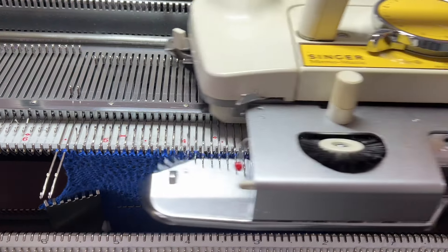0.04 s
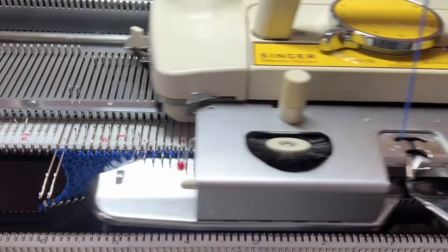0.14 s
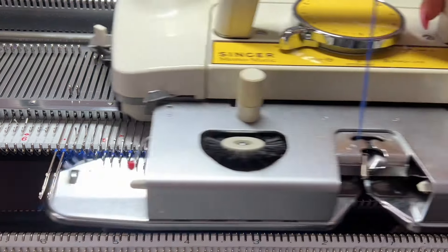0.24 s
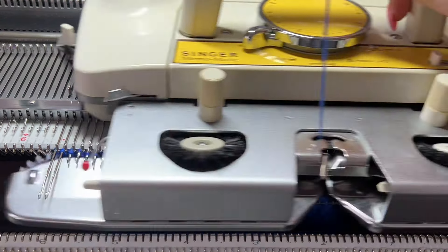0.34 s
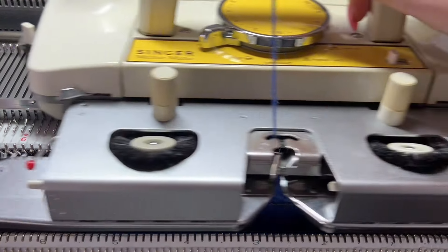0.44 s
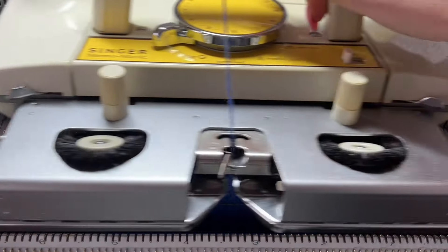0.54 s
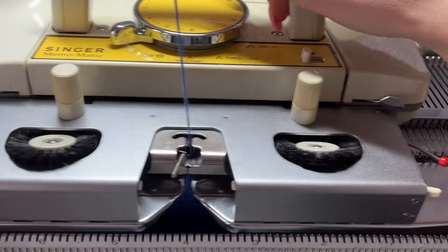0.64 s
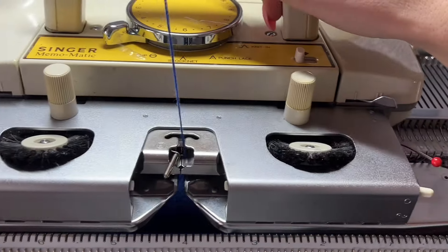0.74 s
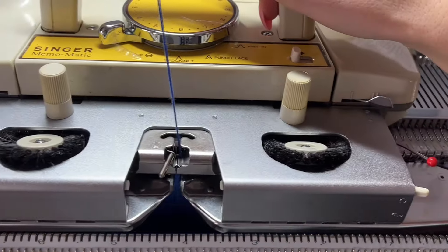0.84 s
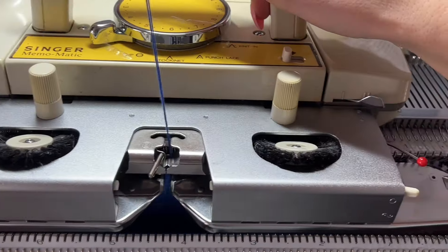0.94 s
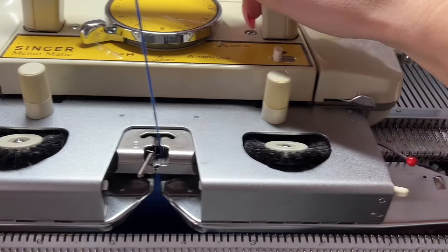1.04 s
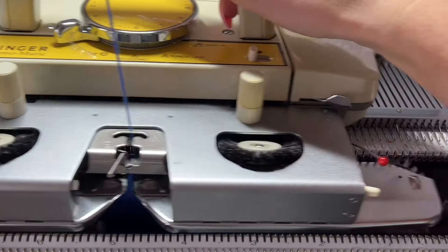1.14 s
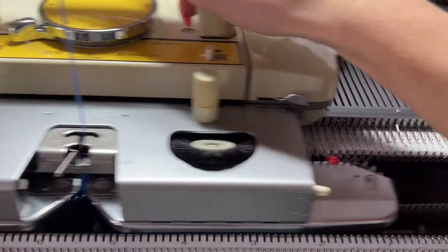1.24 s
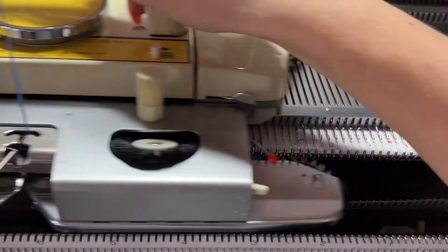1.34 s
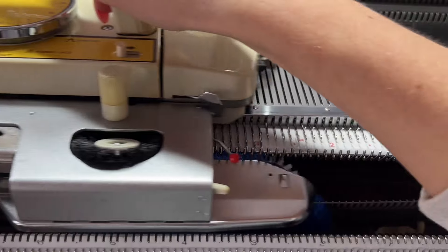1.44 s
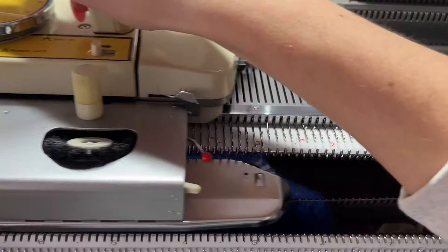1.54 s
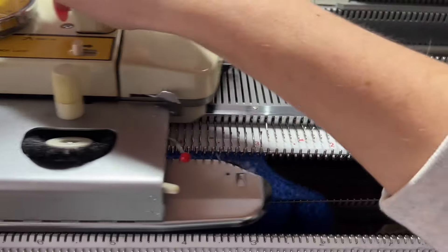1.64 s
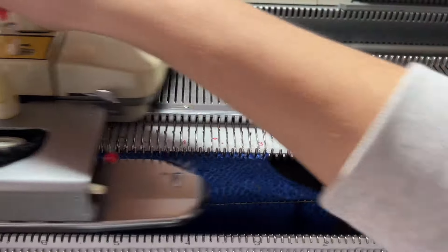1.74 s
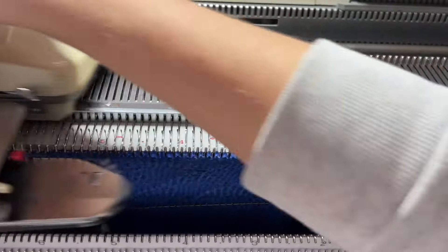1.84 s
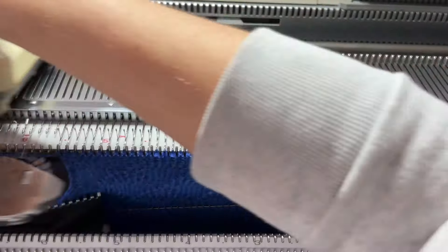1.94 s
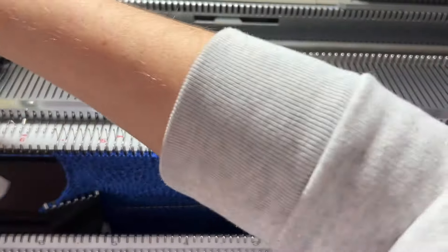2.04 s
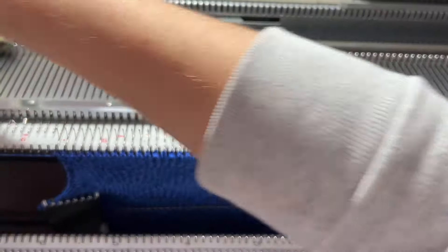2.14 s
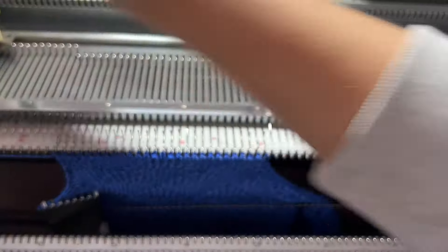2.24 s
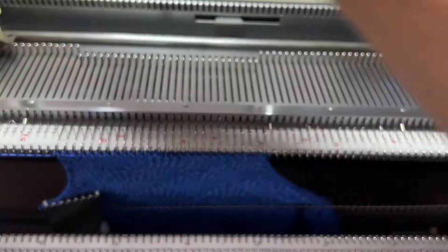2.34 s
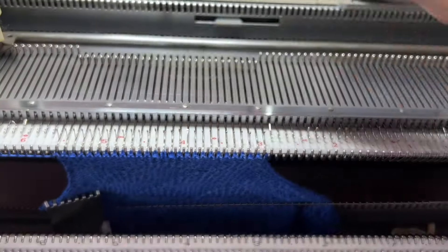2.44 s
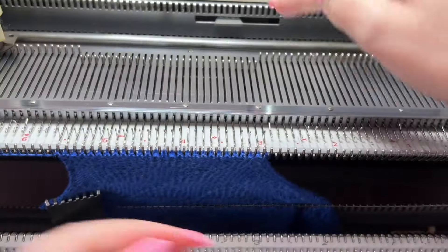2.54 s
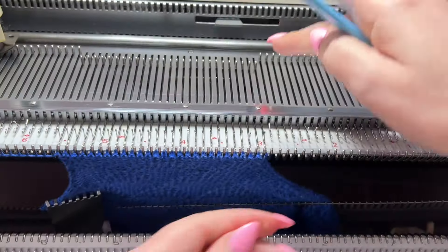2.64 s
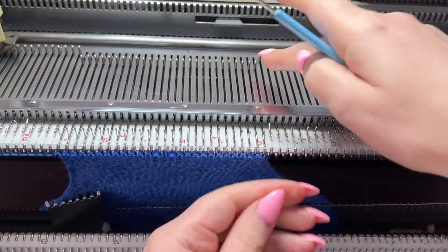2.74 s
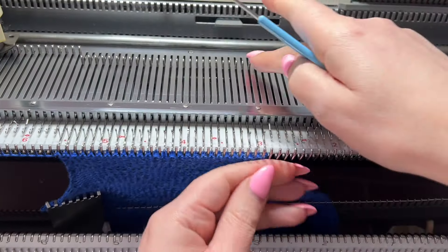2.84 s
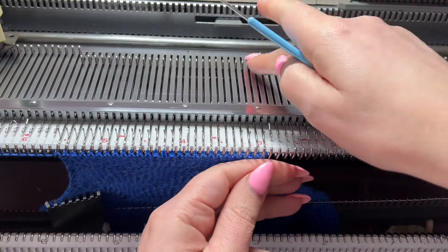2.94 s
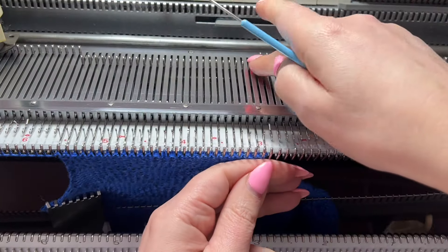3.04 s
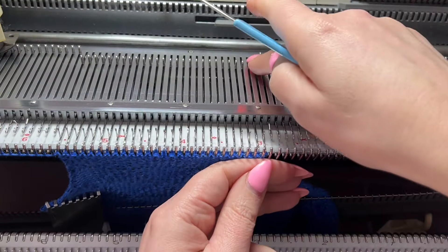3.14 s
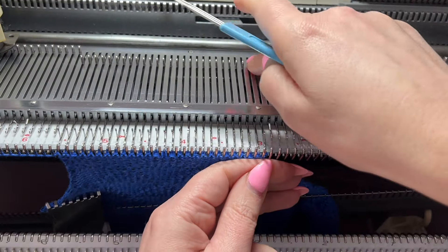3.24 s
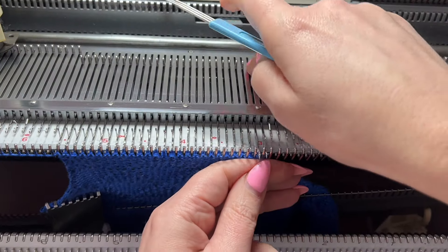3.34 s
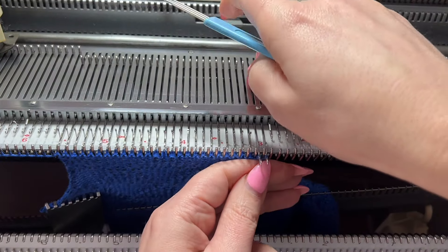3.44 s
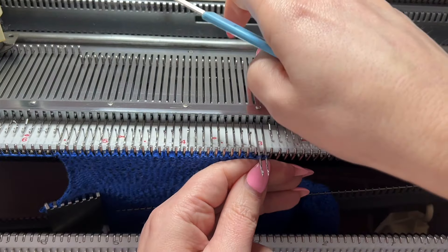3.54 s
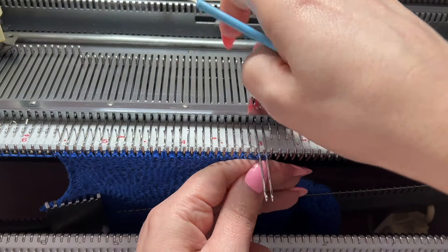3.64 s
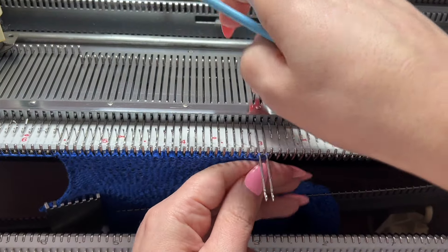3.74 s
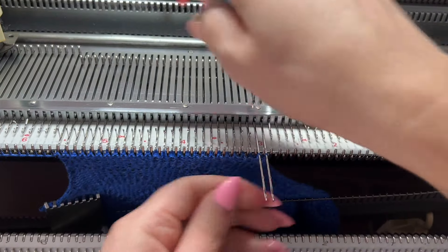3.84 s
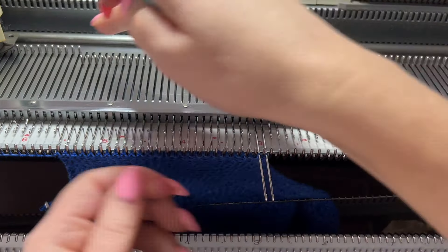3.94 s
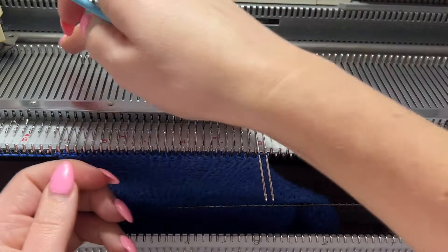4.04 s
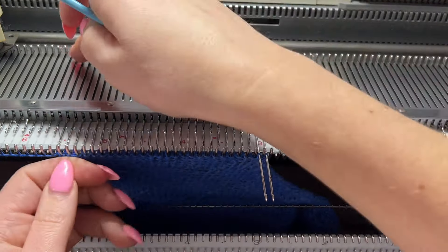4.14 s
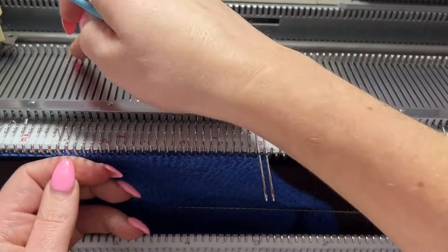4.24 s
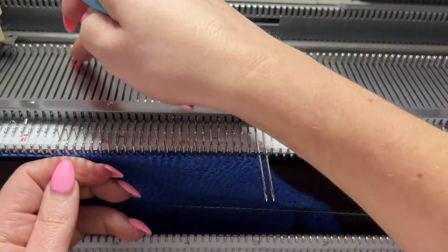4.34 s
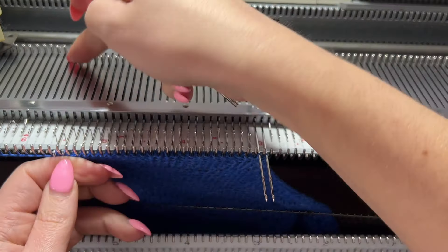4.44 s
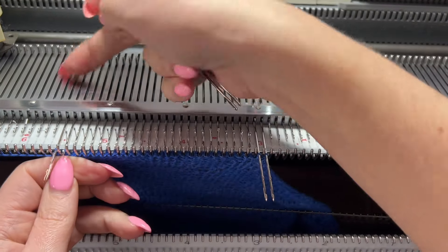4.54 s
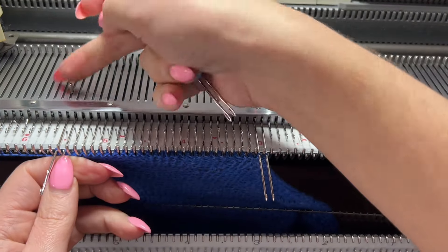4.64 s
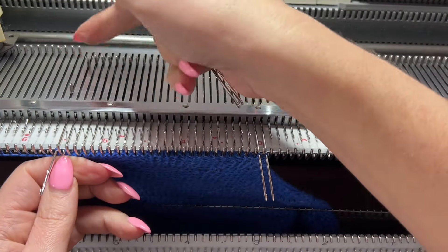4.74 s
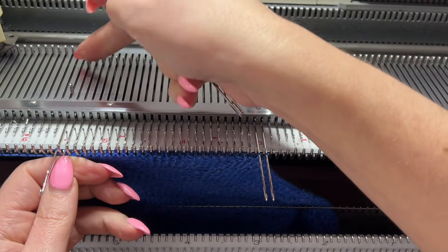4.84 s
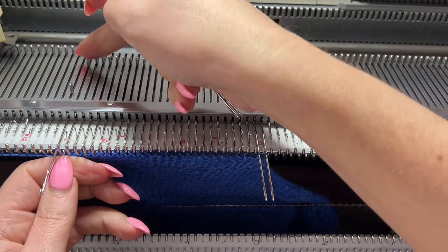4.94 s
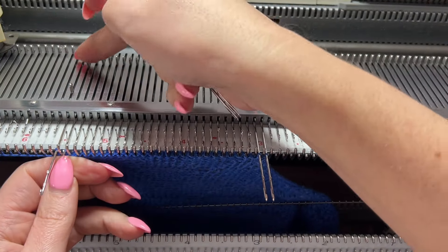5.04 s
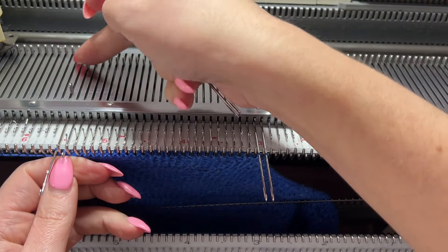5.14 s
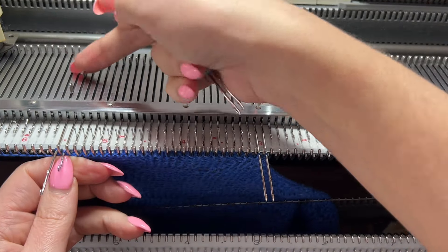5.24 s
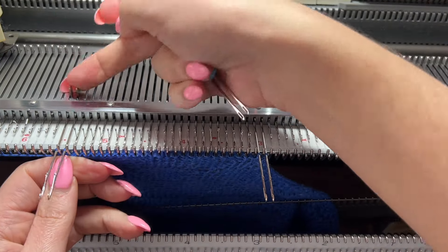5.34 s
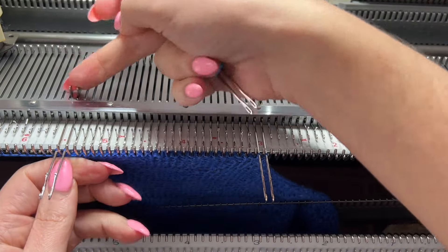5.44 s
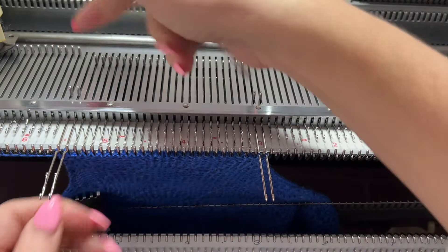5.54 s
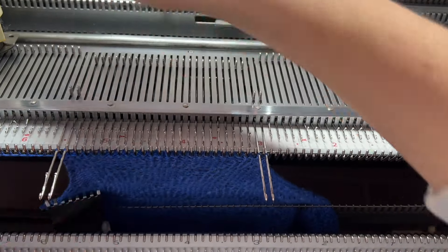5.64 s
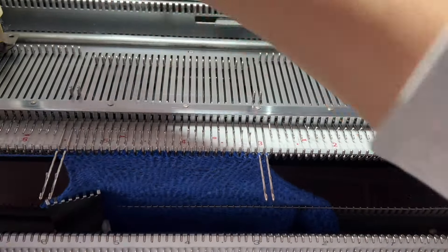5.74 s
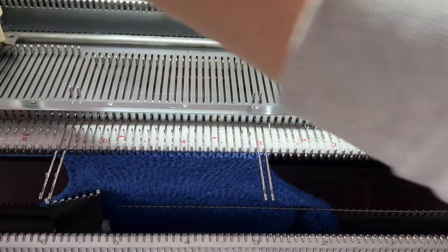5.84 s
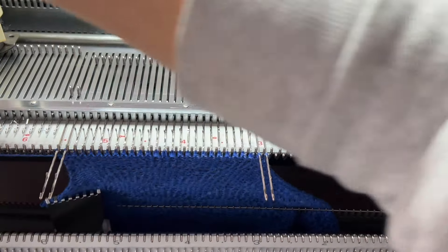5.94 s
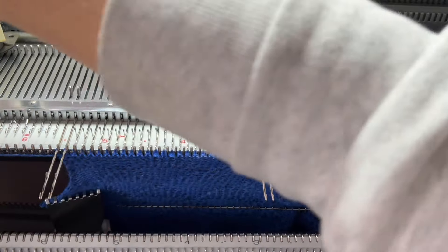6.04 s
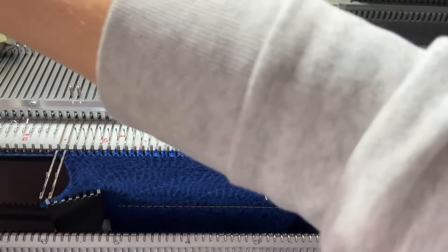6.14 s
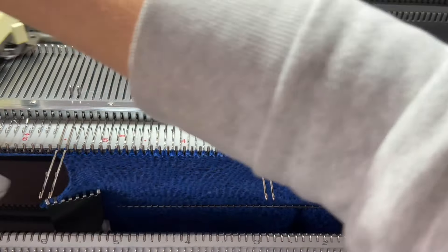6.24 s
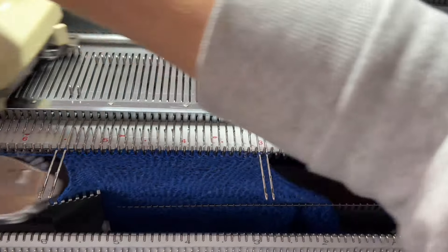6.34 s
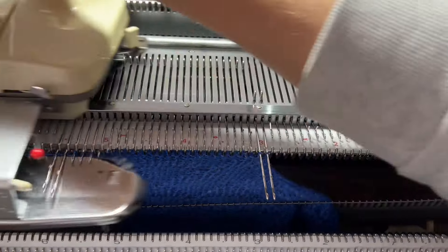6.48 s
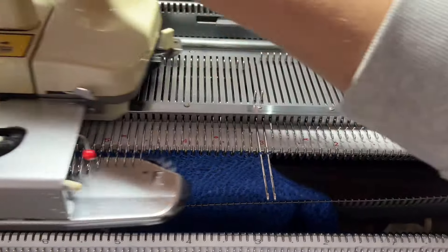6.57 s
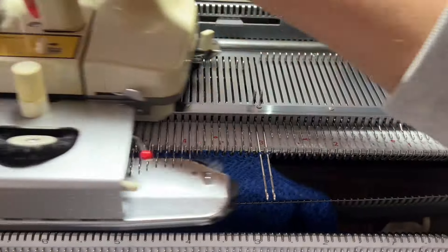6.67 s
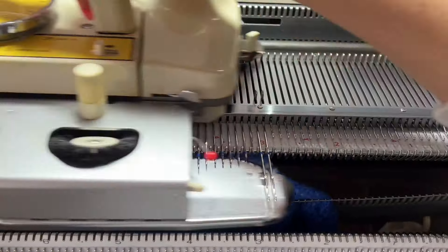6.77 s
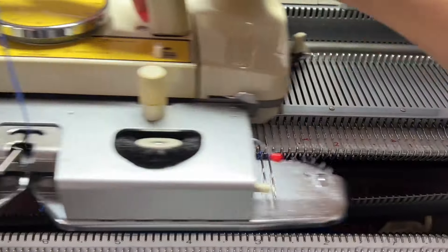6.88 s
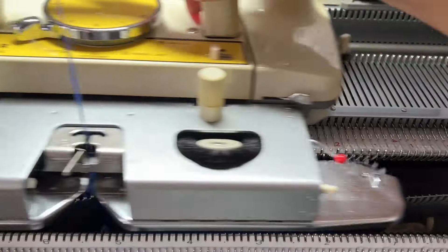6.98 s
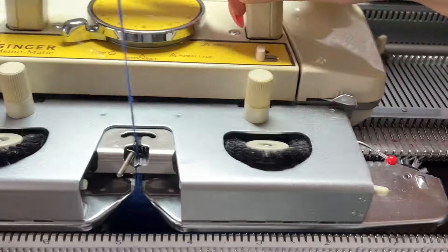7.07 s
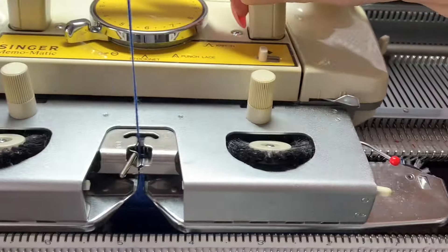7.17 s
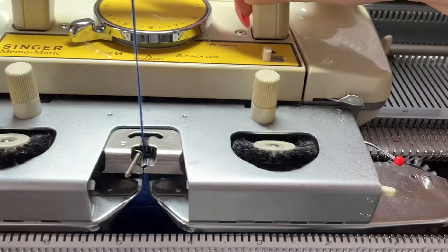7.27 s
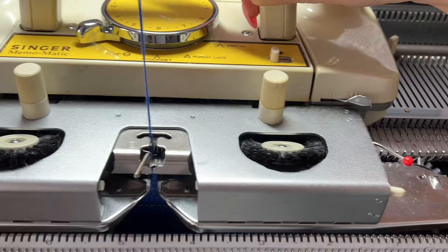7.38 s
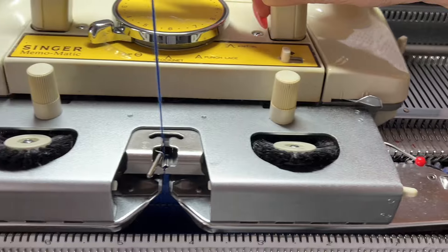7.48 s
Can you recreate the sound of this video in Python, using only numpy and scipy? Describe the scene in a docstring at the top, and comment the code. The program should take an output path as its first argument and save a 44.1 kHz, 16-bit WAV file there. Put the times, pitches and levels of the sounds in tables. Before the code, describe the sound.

A knitting machine carriage rasps and clatters along its steel needle bed, pauses while needles click by hand, then rasps across again.

```python
"""Knitting machine carriage on its needle bed

In a small room a carriage is pushed along a steel needle bed, pauses, and is pushed back. Ticks at each
needle butt drive friction noise and modes of bed and cams; clacks are noise bursts with steel modes.
Knocks ring the low modes of the stand and die away; between the passes needles are clicked by hand."""
import sys
import numpy as np
from scipy import signal
from scipy.fft import rfft, irfft, next_fast_len
from scipy.io import wavfile
from scipy.ndimage import uniform_filter1d

SR = 44100
rng = np.random.default_rng(int(sys.argv[2]) if len(sys.argv) > 2 else 0)


def waveform_to_disk(signal):
    """Save audio, clipped to [-1, 1], as 16-bit WAV at the path in sys.argv[1]."""
    frames = np.transpose(np.atleast_2d(signal))
    scaled = np.clip(frames, -1, 1) * 32767
    samples = np.round(scaled).astype(np.int16)
    wavfile.write(sys.argv[1], SR, samples)


N = 331191
T = np.arange(N) / SR
SLIDE_S = 3.645   # a needle is pushed along its slot

# Needles clicked by hand. Each row: start in seconds, relative levels of snap, steel clink and bed clunk
# in dB, pitch of the needle in Hz, bed tone in Hz, level of that tone above the clunk in dB.
NEEDLE_CLICKS = [(2.8404, -53, -68, -49.5, 8590, 794, -0.5), (2.9307, -57, -63, -60, 3940, 921, -5),
                 (2.9658, -47.5, -62, -66, 4870, 606, -2), (3.0624, -47, -63, -73, 7750, 773, -2),
                 (3.3664, -66.5, -67, -61.5, 3120, 794, -4), (3.4694, -25, -46.5, -44.5, 8910, 942, -14),
                 (3.6084, -24, -38.5, -35, 8570, 813, -7), (3.6448, -13.5, -34.5, -41.5, 8470, 929, -8),
                 (4.1474, -62, -74, -73, 3350, 552, -1.5), (4.5154, -19, -40, -41, 8190, 764, 0),
                 (4.557, -29, -47, -47, 8220, 778, -1), (4.857, -59, -73, -68, 7980, 942, -9),
                 (4.9454, -61, -79, -74.5, 3510, 603, 3), (5.117, -41, -60, -67, 4280, 600, -3),
                 (5.2053, -25.5, -49.5, -49, 8190, 732, -7), (5.3124, -28, -41, -41.5, 8510, 1260, -3),
                 (5.3258, -5, -23.5, -31, 8730, 1080, -6)]
# Resonances of bed and carriage shell. Each row: centre in Hz, width in Hz, peak in dB.
BED_RESONANCES = [(289.5, 30, 2), (295, 77, 2), (420, 100, 7.5), (497.7, 60, 7), (650, 20, 3.5),
                  (790, 150, -2), (1040, 120, -0.5), (1970, 70, 4.5), (2480, 290, 2), (3230, 66, 3.5),
                  (4520, 180, -2), (7655, 430, 1.5), (8253, 440, 2)]


def from_db(db):
    """Level and amplitude: 20 dB is a factor of ten."""
    return 10 ** (np.asarray(db) / 20)


def gains(tables):
    """Envelopes: each dB column becomes a gain in time, silent outside the spans of its tables."""
    total = 0
    for rows in tables:
        s, *columns = np.transpose(rows)
        total = total + from_db([np.interp(T, s, db, left=-150, right=-150) for db in columns])
    return total


def colour(x, spectrum, resonances=()):
    """Minimum-phase filtering: causal, with this spectrum and these peaks; white noise keeps its power."""
    size = 2 * next_fast_len(x.shape[-1] // 2 + SR // 8)
    hz = np.maximum(np.fft.rfftfreq(2 ** 13, 1 / SR), 1)
    points = np.array(spectrum)
    db = np.interp(np.log(hz), np.log(points[:, 0]), points[:, 1])
    for centre, width, peak_db in resonances:
        db = db + peak_db / (1 + (2 * (hz - centre) / width) ** 2)
    gain = from_db(db) / np.sqrt(np.mean(from_db(db) ** 2))
    cepstrum = irfft(np.log(gain))
    cepstrum[1:len(hz) - 1] *= 2      # folded onto positive time: nothing sounds early
    cepstrum[len(hz):] = 0
    impulse_response = irfft(np.exp(rfft(cepstrum)))
    return irfft(rfft(x, size) * rfft(impulse_response, size))[..., :x.shape[-1]]


def fade(t, t60):
    """Exponential decay: the amplitude is 60 dB down at t60 seconds."""
    return np.exp(-np.log(1000) * t / max(t60, 1e-3))


def rms_one(x):
    """Normalisation: scaled to unit power."""
    return x / np.sqrt(np.mean(x ** 2) + 1e-20)


def clicks(times, heights):
    """Impulsive excitation: one impulse at each time."""
    out = np.zeros(N)
    np.add.at(out, np.clip((np.asarray(times) * SR).astype(int), 0, N - 1), heights)
    return out


def ring(hits, hz, t60):
    """Damped resonator: a unit impulse sets a sine of about height 1 ringing."""
    r, w = fade(1 / SR, t60), 2 * np.pi * hz / SR
    return signal.lfilter([0, np.sin(w)], [1, -2 * r * np.cos(w), r * r], hits + 1e-18)


def strikes(times, levels_db, t60, tail_db, tail_t60, lead):
    """Dense modes as noise: a blow swells up within milliseconds, bursts and drops fast; a quieter tail follows."""
    before = SR // 30
    t = np.arange(-before, SR // 2) / SR
    out, since = np.zeros(N + SR), np.maximum(t, 0)
    onset = np.exp(np.minimum(t, 0) / lead)
    shape = onset * (fade(since, t60) + from_db(tail_db) * fade(since, tail_t60))
    for s, db, noise in zip(times, levels_db, rng.standard_normal((len(times), len(t)))):
        start = int(max(s, 0) * SR)
        out[start:start + len(t)] += from_db(db) * shape * noise
    return out[before:before + N]


def hush():
    """Diffuse background: steady coloured noise, mostly common to both sides."""
    # Room tone spectrum. Each row: frequency in Hz, relative level in dB per Hz.
    room_tone = [(20, -23.5), (45, -3.5), (62, 5), (85, -2.5), (120, 6.5), (200, -0.5), (300, -1.5),
                 (450, -5), (650, -14.5), (1200, -23.5), (2500, -34), (8000, -39), (15000, -49.5)]
    shared = rng.standard_normal(N)
    separate = .25 * rng.standard_normal((2, N))
    return from_db(-60.5) * colour(shared + separate, room_tone)


def room(x, t60, wet_db):
    """Diffuse reverberation: decaying noise, different on each side, strongest in the middle range."""
    # Reverberation spectrum. Each row: frequency in Hz, relative level in dB per Hz.
    room_colour = [(60, -12), (250, 7.5), (500, 5.5), (800, 9.5), (1300, 8.5), (2200, -3), (5000, -28.5),
                   (15000, -4)]
    t = T[:SR // 2]
    build_up = 1 - np.exp(-t / 0.0019)
    tail = rng.standard_normal((2, len(t))) * fade(t, t60) * build_up
    tail = colour(tail / np.sqrt(np.sum(tail[0] ** 2)), room_colour)
    return from_db(wet_db) * signal.fftconvolve(x[None], tail, axes=1)[:, :N]


def stereo_width(x, t60, wet_db):
    """Stereo width: a short diffuse smear of the treble, opposite in sign at the two ports."""
    t = T[:SR // 25]
    treble = signal.butter(2, 1000, "high", fs=SR, output="sos")
    smear = signal.sosfilt(treble, rng.standard_normal(len(t)) * fade(t, t60))
    side = signal.fftconvolve(x, smear / np.sqrt(np.sum(smear ** 2)))[:N]
    return from_db(wet_db) * np.array([side, -side])


def stand(contact_s, count=6):
    """Modal response to soft impact: knocks ring the low modes; left alone, the stand rocks evenly, weaker."""
    # The carriage jolts the stand. Each row: time in seconds, relative level in dB.
    knocks = [(0.111, -34), (0.234, -32), (0.596, -31), (0.727, -36), (1.274, -39), (1.413, -32),
              (1.852, -36), (7.267, -31), (7.491, -34)]
    # Modes of the stand. Each row: frequency in Hz, relative level in dB, t60 in seconds.
    stand_modes = [(72, -12.5, 0.44), (131, -4.5, 0.27), (151, 8.5, 0.16), (191, -6, 0.17), (303, -6, 0.11),
                   (400, -10.5, 0.13)]
    # the carriage stops and the stand rocks itself out
    rock_start_s, rock_period_s, rock_db, rock_loss_db = 2.078, .209, -28.5, 6
    rocking = [(rock_start_s + k * rock_period_s, rock_db - k * rock_loss_db) for k in range(count)]
    s, db = np.transpose(list(knocks) + rocking)
    t = T[:SR // 2]
    modes = sum(from_db(level) * np.sin(2 * np.pi * hz * t) * fade(t, t60) for hz, level, t60 in stand_modes)
    soft_onset = 1 - np.exp(-t / contact_s)
    low_cut = signal.butter(2, 45, "high", fs=SR, output="sos")
    response = signal.sosfilt(low_cut, modes * soft_onset)
    return signal.fftconvolve(clicks(s, from_db(db)), response)[:N]


def metal_blows(table, snap_db, clink_db, clunk_db, snap_t60, clunk_t60, tail_db, snap_tail_t60,
                tail_t60, lead, modes_db):
    """Impact of steel on steel: a bright snap, a clink of the part, a slower clunk, and the modes of the bed."""
    # Spectra of the three parts of a blow. Each row: frequency in Hz, relative level in dB per Hz.
    snap_spectrum = [(2000, -24.5), (5000, -6), (7000, 1.5), (8700, 3), (10000, 1.5), (12000, 2.5),
                     (15500, -3)]
    clink_spectrum = [(700, -21.5), (1700, -6.5), (2200, -2), (3400, 1), (4700, 1.5), (6500, -3.5),
                      (10000, -23)]
    clunk_spectrum = [(25, -19.5), (60, -6.5), (200, -5.5), (300, -8.5), (480, -3), (750, -0.5), (1050, 2),
                      (1350, -3), (1800, -7.5), (5000, -42.5)]
    # Modes of the steel bed and its needles. Each row: frequency in Hz, relative level in dB, t60 in seconds.
    steel_modes = [(720, -10.5, 0.4), (777, -9.5, .3), (922.6, -6, 0.39), (1042.4, -5.5, 0.14),
                   (1307, -10.5, 0.17), (1840, -15.5, 0.23), (2146, -12, 0.26), (2690, -5, 0.14),
                   (3420, -4, 0.15), (3885, 2, 0.08), (4660, -2.5, 0.13), (4730, -4.5, 0.083),
                   (5670, -7.5, 0.14), (6560, -6, .14), (7726, -5, 0.088), (8107, -6.5, .14),
                   (8630, -12.5, 0.16), (11986, -4, 0.081)]
    s, snap, clink, clunk = np.transpose(table)[:4]
    snap, clink, clunk = snap + snap_db, clink + clink_db, clunk + clunk_db
    snap_noise = strikes(s, snap, snap_t60, tail_db, snap_tail_t60, lead)
    clink_noise = strikes(s, clink, snap_t60, tail_db, tail_t60, lead)
    clunk_noise = strikes(s, clunk, clunk_t60, tail_db=-16, tail_t60=.35, lead=0.00097)
    out = (colour(snap_noise, snap_spectrum, BED_RESONANCES)
           + colour(clink_noise, clink_spectrum, BED_RESONANCES)
           + colour(clunk_noise, clunk_spectrum, BED_RESONANCES))
    chance = rng.standard_normal((len(s), len(steel_modes)))
    for (hz, db, mode_t60), luck in zip(steel_modes, chance.T):
        # low modes follow the clunk, middle ones the clink, high ones the snap
        force_db = clunk + 4 if hz < 1500 else clink if hz < 7000 else snap - 4
        level_db = force_db + db + modes_db + 3 * np.clip(luck, -2, 1.5)
        out += ring(clicks(s, np.sign(luck) * from_db(level_db)), hz, mode_t60)
    return out


def part_pings(table, clink_db, snap_db, t60, beat):
    """Beating of close modes: each struck part rings as a pair, low with the clink, high with the snap."""
    out, t = np.zeros(N + SR), T[:SR // 5]
    for s, snap, clink, _, hz in np.array(table)[:, :5]:
        second_hz = hz * (1 + beat * rng.uniform(-1, 1))
        pair = np.sin(2 * np.pi * hz * t) + 0.5 * np.sin(2 * np.pi * second_hz * t)
        level_db = clink + clink_db if hz < 6500 else snap + snap_db
        start = int(s * SR)
        out[start:start + len(t)] += from_db(level_db) * pair * fade(t, t60)
    return out[:N]


def bed_tones(t60):
    """Position-dependent modal excitation: where a needle lands decides which low bed tone stands out."""
    return sum(ring(clicks([s], from_db(clunk + tone_db)), hz, t60)
               for s, _, _, clunk, _, hz, tone_db in NEEDLE_CLICKS)


def slide():
    """Sliding friction: rumble and drone gains of a pushed needle; attack, hold, release, the drone decaying."""
    attack_s, hold_s, release_s = .03, .24, .08
    rumble_db, drone_db, drone_t60_s = -50, -52, .55
    corners = SLIDE_S + np.array([-attack_s, 0, hold_s, hold_s + release_s])
    push = np.interp(T, corners, [0, 1, 1, 0])
    drone_fade = fade(np.maximum(T - SLIDE_S, 0), drone_t60_s)
    return from_db(rumble_db) * push, from_db(drone_db) * push * drone_fade


def judders(t60, count=4):
    """Stick-slip: a needle catches and slips ever more slowly, with dull bumps in the bed."""
    # Spectrum of a bump. Each row: frequency in Hz, relative level in dB per Hz.
    bump_spectrum = [(50, -7.5), (80, -2), (160, -10), (290, 14.5), (450, -1.5), (800, 5), (1200, -28),
                     (3000, -52)]
    level_db, first_gap_s, slowing = -45, .058, 1.2   # each gap is longer than the last by this factor
    gaps = first_gap_s * slowing ** np.arange(count - 1)
    s = SLIDE_S + np.append(0, np.cumsum(gaps))
    bumps = strikes(s, np.full(count, level_db), t60, tail_db=-32, tail_t60=.2, lead=0.0024)
    return colour(bumps, bump_spectrum, BED_RESONANCES)


def hand_work():
    """Impact and friction: needles are clicked forward one by one; one judders along its slot."""
    blows = metal_blows(NEEDLE_CLICKS, snap_db=-11.5, clink_db=-2, clunk_db=-7, snap_t60=.035,
                        clunk_t60=0.16, tail_db=-17.5, snap_tail_t60=.29, tail_t60=0.38, lead=0.001,
                        modes_db=-12.5)
    pings = part_pings(NEEDLE_CLICKS, clink_db=-3, snap_db=-15.5, t60=0.043, beat=0.0406)
    return blows + pings + bed_tones(t60=0.18) + judders(t60=0.106)


def latches(rasp):
    """Irregular impacts: stray latches flick shut under the carriage, as strong as the cams are busy."""
    per_s, low_hz, high_hz, spread_db = 9, 2440, 8800, 0.5
    gap, size, pitch = rng.random((200, 3)).T
    s = np.cumsum(.5 + gap) / per_s
    db = 20 * np.log10(np.interp(s, T, rasp)) + spread_db * (2 * size - 1)
    hz = low_hz * (high_hz / low_hz) ** pitch
    rows = np.transpose([s, db + 8, db - 14, db - 10.5, hz])   # columns like those of the cam clacks
    return rows[(s < T[-1]) & (db > -70)]


def cam_clacks(rasp):
    """Impact excitation: the cams strike hard now and then, with stray latches in between."""
    # The cams strike. Each row: time in seconds, relative levels of snap, steel clink and bed clunk in dB,
    # pitch of the part in Hz.
    clacks = [(0.0385, -21, -29, -35.5, 2546), (0.0976, -18, -34, -34.5, 6700), (0.234, -7, -19, -28, 7580),
              (0.57, -4.5, -16, -20.5, 7510), (0.5854, -14.5, -22, -22.5, 2356),
              (0.87, -37, -44, -45, 2433), (0.8978, -32, -45.5, -42, 2400), (0.9492, -34, -40, -48.5, 2380),
              (1.0179, -23, -32, -34, 4940), (1.0776, -15, -44, -40, 6760),
              (1.1827, -16.5, -45, -33.5, 8670), (1.2668, -15.5, -44, -35, 7750),
              (1.3798, -21, -33.5, -30.5, 2650), (1.4574, -20.5, -36.5, -42.5, 2640),
              (1.5238, -15, -31, -33, 8720), (1.6326, -14, -25.5, -32, 2530),
              (1.7016, -20, -37.5, -37, 8790), (1.7863, -16, -33, -40, 6270), (1.941, -5, -17.5, -33, 3130),
              (2.16, -26, -43, -46, 7995), (2.4481, -69, -68.5, -58, 2340),
              (6.0625, -32.5, -35.5, -42, 4870), (6.1838, -42.5, -52, -55, 5500),
              (6.2747, -27.5, -34, -34.5, 8230), (6.3874, -29, -33.5, -38, 3640),
              (6.574, -22, -34, -38, 3320), (7.2714, -28.5, -49, -48.5, 3530),
              (7.3858, -28, -39.5, -38.5, 2480), (7.4556, -21.5, -45, -41.5, 2500)]
    blows = np.vstack([clacks, latches(rasp)])
    impacts = metal_blows(blows, snap_db=-9.5, clink_db=0.5, clunk_db=-0.5, snap_t60=0.031,
                          clunk_t60=0.088, tail_db=-21, snap_tail_t60=.33, tail_t60=0.43, lead=0.00043,
                          modes_db=-17.5)
    return impacts + part_pings(blows, clink_db=-1.5, snap_db=-11.5, t60=.04, beat=.05)


def needle_chatter(effort, uneven_db, jitter, count=3):
    """Tick rate set by speed: each needle butt meets the cams in turn; more effort, more speed."""
    # needles passed per second at the reference effort; share of the effort's swing that the speed follows
    reference_db, needles_per_s, speed_follows = -42, 58, .55
    travel = np.cumsum(needles_per_s * (effort / from_db(reference_db)) ** speed_follows) / SR
    butts = np.arange(min(int(travel[-1]), 1000))
    chance = rng.standard_normal((2, count, 1000))[..., :len(butts)]
    places = butts + rng.random((count, 1)) + jitter * chance[0]
    times = np.interp(places, travel, T)
    # several ticks a needle, each series weaker than the last
    levels_db = -3.5 * np.arange(count)[:, None] + uneven_db * np.clip(chance[1], -2, 1.5)
    return times.ravel(), from_db(levels_db).ravel()


def rattle(ticks, low_hz, high_hz, ping_t60, ping_db, spread_db, tick_db, tick_t60, count=24):
    """Friction and modal ringing: noise surges at each tick, and every tick favours other modes; rms 1."""
    times, heights = ticks
    surge = signal.lfilter([1], [1, -fade(1 / SR, tick_t60) ** 2], clicks(times, heights ** 2))
    power = 1 + from_db(tick_db) ** 2 * surge
    friction = rng.standard_normal(N) * np.sqrt(power / uniform_filter1d(power, SR // 12))
    chance = rng.standard_normal((count, 2, 3000))[..., :len(times)]
    pings = 0
    for hz, (sign, size) in zip(np.geomspace(low_hz, high_hz, count), chance):
        hits = heights * np.sign(sign) * from_db(spread_db * np.minimum(size, 1.7))
        pings = pings + ring(clicks(times, hits), hz, ping_t60)
    # slow swings in level are evened out
    pings /= np.sqrt(uniform_filter1d(pings ** 2, SR // 8) + 0.023 * np.mean(pings ** 2))
    return rms_one(friction + from_db(ping_db) * pings)


def carriage(effort, rasp):
    """Periodic excitation of resonances: ticks rasp in the cams and drone in the bed; the stand rumbles."""
    # The carriage lurches and the stand sways. Each row: time in seconds, rumble level in dB.
    lurches = [(1.31, -43), (1.64, -38.5), (1.92, -37), (6.3, -46), (6.47, -37), (6.61, -36.5),
               (7.11, -39.5)]
    # Spectra of stand, bed and cams. Each row: frequency in Hz, relative level in dB per Hz.
    rumble_spectrum = [(20, -41.5), (40, -15), (55, -1), (73, 7.5), (95, -6), (125, 4), (155, 3.5),
                       (200, -9.5), (300, -26), (900, -62.5)]
    drone_spectrum = [(100, -24.5), (230, 4.5), (350, -2), (500, -1.5), (720, 4), (900, -0.5), (1250, -4.5),
                      (1700, -10), (3000, -17.5), (9000, -49.5)]
    rasp_spectrum = [(300, -16), (800, -4.5), (1200, 4), (1700, -5), (2300, -4.5), (2900, -3.5),
                     (3500, -1.5), (6000, -1.5), (8500, 1), (10000, 2), (12500, 1.5), (15800, -1.5)]
    lurch_width_s, rumble_db = 0.029, -2.5   # rumble relative to the drone
    slide_rumble, slide_drone = slide()
    sway = sum(from_db(db) * np.exp(-((T - s) / lurch_width_s) ** 2) for s, db in lurches)
    drone = effort + slide_drone
    ticks = needle_chatter(drone, uneven_db=1.0, jitter=.22)
    mid = rattle(ticks, low_hz=274.0, high_hz=1388, ping_t60=0.09, ping_db=-10.5, spread_db=6.5,
                 tick_db=0.0, tick_t60=0.027, count=30)
    high = rattle(ticks, low_hz=1900, high_hz=13000, ping_t60=.035, ping_db=-3, spread_db=8,
                  tick_db=3, tick_t60=.022, count=36)
    shaking = rng.standard_normal(N) * (from_db(rumble_db) * effort + sway + slide_rumble)
    return (colour(shaking, rumble_spectrum)
            + colour(mid * drone, drone_spectrum, BED_RESONANCES)
            + colour(high * rasp, rasp_spectrum, BED_RESONANCES))


def scene():
    """Superposition: the machine close by, its stereo width and reverberation, and the low hush of the room."""
    # Three pushes of the carriage, a table for each. Each row: time in seconds, effort as the drone of the
    # bed in dB, rasp of the cams on the needles in dB.
    passes = [
        [(0, -45, -37.5), (.07, -45, -32.5), (.22, -44, -32), (.32, -49, -36.5), (.43, -43, -28.5),
         (.55, -44, -28.5), (.63, -40, -32), (.69, -52, -55), (.83, -62, -56), (1.0, -64, -59.5)],
        [(1.02, -48, -39), (1.11, -53, -34.5), (1.29, -39, -28), (1.43, -43, -37), (1.58, -51, -47),
         (1.7, -43, -41.5), (1.92, -39, -37), (2.0, -48, -61), (2.08, -46, -64), (2.32, -69, -88)],
        [(6.1, -64, -87), (6.24, -58, -59.5), (6.4, -49, -43), (6.46, -36, -30), (6.53, -45, -35.5),
         (6.88, -42, -28), (7.06, -41, -28.5), (7.11, -47.5, -51), (7.2, -60, -61), (7.51, -50, -42)],
    ]
    effort, rasp = gains(passes)
    machine = carriage(effort, rasp) + stand(contact_s=.008) + hand_work() + cam_clacks(rasp)
    width = stereo_width(machine, t60=0.044, wet_db=-23)
    reverberation = room(machine, t60=0.15, wet_db=-15)
    return machine + width + reverberation + hush()


def record(dry):
    """Level and phase differences of two ports: the left is fuller in the lows, its treble phase lags."""
    # Lag of the left microphone port behind the right. Each row: frequency in Hz, lag in cycles.
    port_lag = [(600, 0), (760, .05), (1050, .01), (1650, .02), (2000, 0), (2850, 0), (3270, -.06),
                (3800, 0), (8700, 0), (9900, .5), (10500, .5), (11600, 1), (12400, 1), (13500, 1.5),
                (14300, 1.5), (15200, 2)]
    size = next_fast_len(N + SR // 10, real=True)
    hz = np.fft.rfftfreq(size, 1 / SR)
    lag = np.exp(-2j * np.pi * np.interp(hz, *np.transpose(port_lag)))
    lean = from_db(1.1 / (1 + (hz / 2000) ** 2))
    ports = irfft(rfft(dry, size) * np.array([lean * lag, 1 / lean]), size)[:, :N]
    top_cut = signal.ellip(10, .3, 80, 16000, fs=SR, output="sos")   # steep, at 16 kHz
    return signal.sosfilt(top_cut, ports)


dry = scene()
out = record(dry)
waveform_to_disk(out)
```